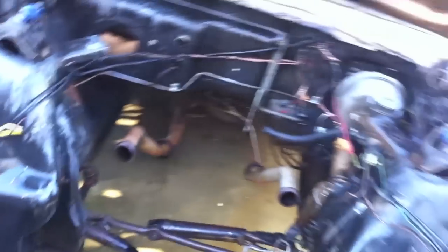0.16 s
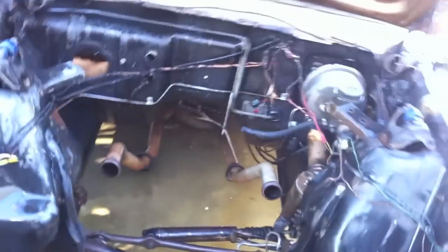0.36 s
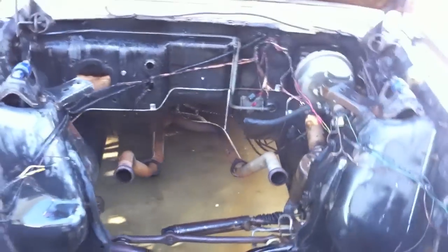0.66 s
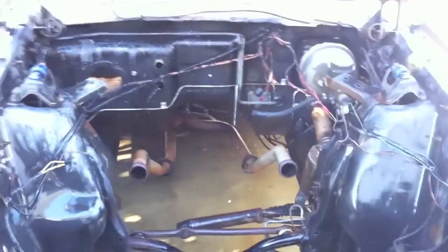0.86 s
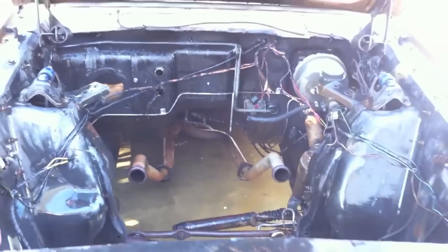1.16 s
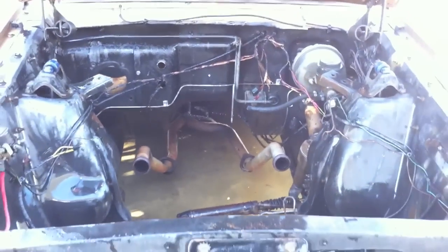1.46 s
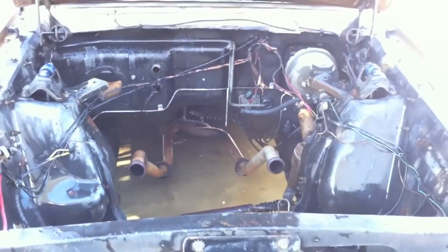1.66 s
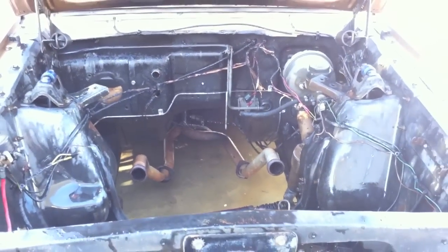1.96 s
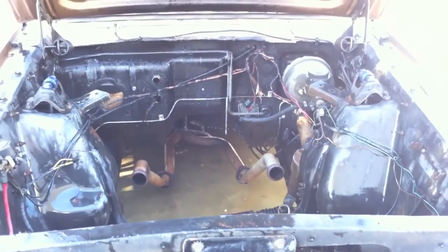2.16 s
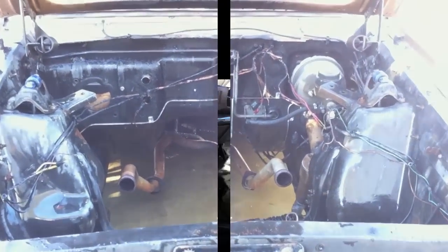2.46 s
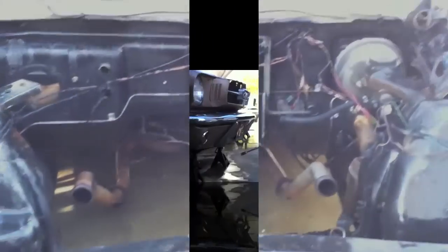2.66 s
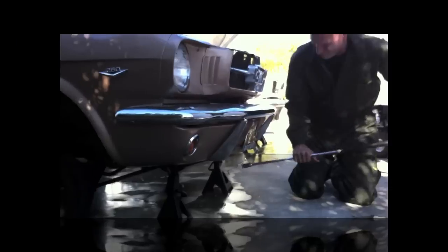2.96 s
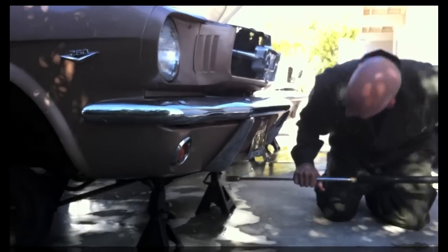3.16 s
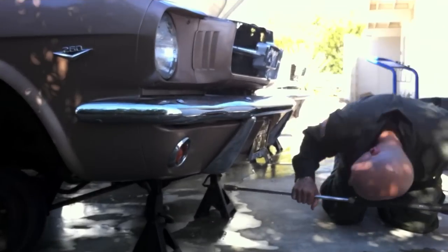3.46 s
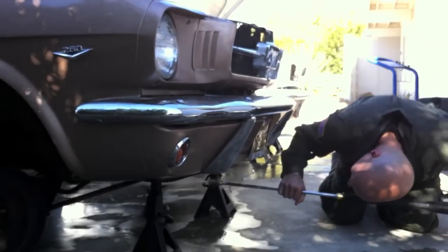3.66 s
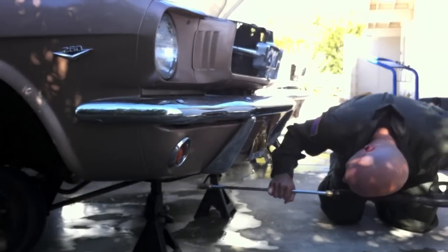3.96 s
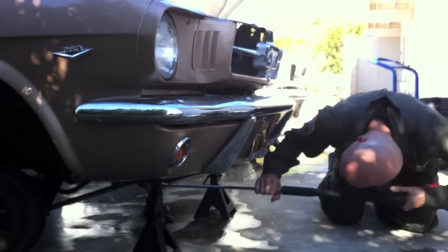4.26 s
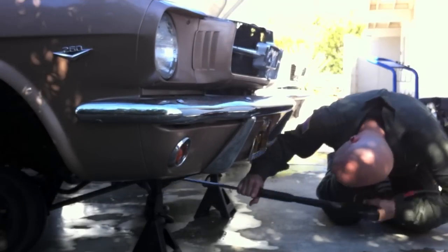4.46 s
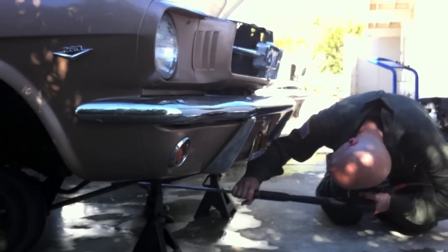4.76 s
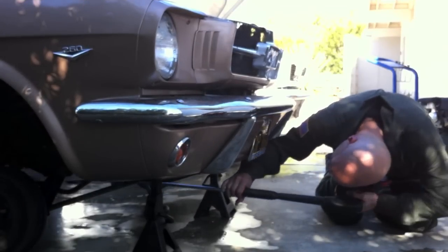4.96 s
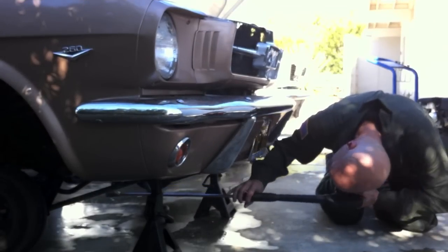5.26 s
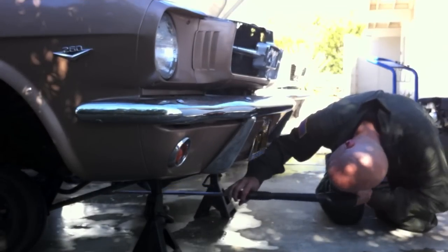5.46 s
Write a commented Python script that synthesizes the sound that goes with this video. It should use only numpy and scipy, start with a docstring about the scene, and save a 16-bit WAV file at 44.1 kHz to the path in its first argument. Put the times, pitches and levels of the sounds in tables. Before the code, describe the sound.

For the first 2.4 seconds there is only quiet outdoor air and a faint, wavering distant hum. Small handling ticks and a tiny clink come from an open engine bay, with a faint ringing metal scrape around 0.8 to 1.3 seconds. Between 2.4 and 3.3 seconds this fades into a much louder single-cylinder petrol pressure washer, puttering steadily in a driveway. At 3.8 seconds a water jet starts with a sharp spurt, hissing brightly and drumming under a car. The pump whines, and the engine dips in speed and turns harsher. The jet stops at about 4.3 seconds with four quick sputters of hiss as the engine recovers. A second spray starts at about 4.5 seconds and runs to the end, near 5.6 seconds, splashing harder against metal edges around 5.1 seconds. Soft low puffs of air touch the microphone during the spraying.

```python
"""A far hum over outdoor air, with small handling ticks and a faint metal scrape in an open engine bay.
This fades into a driveway where the single-cylinder four-stroke of a petrol pressure washer putters.
The trigger is pulled twice: the jet hisses and drums under a car, the piston pump whines,
and its load makes the engine sag until the governor opens the throttle."""
import sys
import numpy as np
from scipy import signal
from scipy.fft import rfft, irfft, next_fast_len
from scipy.io import wavfile

SR = 44100
rng = np.random.default_rng(int(sys.argv[2]) if len(sys.argv) > 2 else 0)


def waveform_to_disk(signal):
    """Save audio, clipped to [-1, 1], as 16-bit WAV at the path in sys.argv[1]."""
    frames = np.transpose(np.atleast_2d(signal))
    scaled = np.clip(frames, -1, 1) * 32767
    samples = np.round(scaled).astype(np.int16)
    wavfile.write(sys.argv[1], SR, samples)


N = 247842
TIME = np.arange(N) / SR
PUMP_ORDER = 18  # 3 pistons x 2 turns per firing x 3rd harmonic
LOAD_DELAY_S, LOAD_RISE_S = .083, .105  # pump load after a pull

# trigger pulls (on [s], off [s])
PULLS = [(3.796, 4.33), (4.544, 5.7)]
# hiss spectrum (frequency [Hz], level [dB])
HISS_COLOUR = [(1500, -8), (3000, -2.5), (5000, -3), (7000, -1), (9500, 2), (13000, 1), (15800, -2)]


def from_db(db):
    """Decibels to gain."""
    return 10 ** (np.asarray(db) / 20)


def rms_one(x):
    """Scale to unit rms."""
    return x / np.sqrt(np.mean(x ** 2) + 1e-20)


def in_time(rows):
    """Curve through (time [s], value) rows."""
    return np.interp(TIME, *np.transpose(rows))


def late(x, delay_s):
    """Delayed control curve."""
    return np.interp(TIME - delay_s, TIME, x)


def bell(at_s, sigma_s):
    """Gaussian bump of height 1."""
    return np.exp(-.5 * ((TIME - at_s) / sigma_s) ** 2)


def bumps(events, sigma_s):
    """One bell of gain per (time [s], level [dB]) row."""
    return sum(from_db(db) * bell(at_s, sigma_s) for at_s, db in events)


def swell(cycle, place, width):
    """Bump of height 1 in every engine cycle; place and width in cycles."""
    return np.exp(-.5 * (((cycle - place + .5) % 1 - .5) / width) ** 2)


def at_hz(colour, hz):
    """Gain of a (frequency [Hz], level [dB]) colour; 12 dB/octave roll-off below its first point."""
    knots_hz, db = np.transpose(colour)
    hz = np.maximum(hz, 1)
    return from_db(np.interp(np.log(hz), np.log(knots_hz), db)) * np.minimum(hz / knots_hz[0], 1) ** 2


def noise(colour):
    """Unit-rms noise of a (frequency [Hz], level [dB]) colour."""
    size = next_fast_len(N)
    spectrum = rfft(rng.standard_normal(size)) * at_hz(colour, np.fft.rfftfreq(size, 1 / SR))
    return rms_one(irfft(spectrum, size)[:N])


def drift(rate_hz):
    """Smooth unit-rms random wander, low-passed at rate_hz."""
    hop, settle = 40, 2000
    r = np.exp(-2 * np.pi * rate_hz * hop / SR)
    slow = signal.lfilter([1], [1, -2 * r, r * r], rng.standard_normal(N // hop + settle + 2))[settle:]
    return np.interp(np.arange(N) / hop, np.arange(len(slow)), rms_one(slow))


def resonate(x, hz, width_hz):
    """Two-pole resonance, unit peak gain."""
    r = np.exp(-np.pi * width_hz / SR)
    feedback = [1, -2 * r * np.cos(2 * np.pi * hz / SR), r * r]
    return signal.lfilter(np.array([1, 0, -1]) * (1 - r * r) / 2, feedback, x)


def repeat(partials, cycle, size=4096):
    """Unit-rms wave of complex partials 1, 2, 3.., played once per engine cycle."""
    shape = rms_one(irfft(np.r_[0, partials], size))
    return np.interp(cycle % 1 * size, np.arange(size + 1), np.r_[shape, shape[0]])


def outdoor_air(gain_db=8.0):
    """Soft, mostly low noise around the engine bay."""
    # (time [s], level [dB])
    levels = [(0, -64.5), (1, -64.5), (1.8, -66), (2.38, -65.5)]
    # (frequency [Hz], level [dB])
    colour = [(40, -42), (85, -14.5), (115, -10), (150, -9.5), (185, -1.5), (235, -6), (380, -16.5),
              (620, -15.5), (830, -18), (1100, -22.5), (1750, -27.5), (4000, -31.5), (9300, -33),
              (15800, -36)]
    return from_db(in_time(levels) + gain_db) * noise(colour)


def far_hum(gain_db=0.5, waver_db=1.7, waver_hz=1.15):
    """A distant tone, wavering in level and pitch."""
    # (time [s], frequency [Hz])
    pitches = [(0, 140.5), (.07, 134.5), (1.07, 144.9), (2.38, 149)]
    # (time [s], level [dB])
    levels = [(0, -50), (.06, -45.5), (.29, -55), (.4, -48), (.88, -54.5), (1.05, -51.5), (1.56, -56),
              (1.68, -61), (2.38, -56.5)]
    level_db = in_time(levels) + gain_db + waver_db * drift(11)
    hz = in_time(pitches) + waver_hz * drift(17)
    return from_db(level_db) * np.sqrt(2) * np.sin(2 * np.pi * np.cumsum(hz) / SR)


def ticks(gain_db=-6, tail_t60_s=0.11, crack_t60_s=0.017, crack_share=.45):
    """Handling ticks: noise bursts with a fast crack and a slower tail."""
    # (time [s], level [dB], treble re mids [dB], rise [s])
    touches = [(.09, -54.5, 0, .013), (.24, -54.5, 0, .012), (.481, -45, -17, .001), (.748, -56, 6, .008),
               (.78, -57, 3, .005), (1.017, -55, -6, .003), (1.297, -49, 2, .001), (1.506, -61, -2, .003),
               (1.69, -63, 4, .003)]
    mids = noise([(700, 3), (1800, 2), (3000, -3.0), (5000, -13.5), (12000, -28)])
    treble = noise([(3000, -10), (5500, 3), (8000, -4), (15000, -4)])
    out = np.zeros(N)
    for at_s, db, treble_db, rise_s in touches:
        age_s = np.clip(TIME - at_s, 0, 1)
        dying_s = np.maximum(age_s - rise_s, 0)
        crack = crack_share * from_db(-60 * dying_s / crack_t60_s)
        tail = (1 - crack_share) * from_db(-60 * dying_s / tail_t60_s)
        envelope = np.minimum(age_s / rise_s, 1) * (crack + tail)
        out += from_db(db + gain_db) * envelope * (mids + from_db(treble_db) * treble)
    return out


def clink():
    """A small clink: one decaying sine."""
    # (time [s], frequency [Hz], level [dB], t60 [s])
    strikes = [(.096, 1650, -55, 0.06)]
    out = np.zeros(N)
    for at_s, hz, db, t60_s in strikes:
        age_s = np.clip(TIME - at_s, 0, 1)
        out += from_db(db - 60 * age_s / t60_s) * np.sin(2 * np.pi * hz * age_s)
    return out


def scrape(friction_db=-2, ring_db=6, grain_db=2.5, attack_s=0.0074, t60_s=0.27):
    """Each stroke bites, holds and dies away; its grainy friction sets the metal ringing."""
    # (start [s], length [s], level [dB], ring drive re friction [dB])
    strokes = [(0.748, .11, -66, -4), (0.863, 0.053, -61, 11), (0.926, .04, -58.5, -4),
               (1.002, .035, -63, -4), (1.08, 0.1, -71, -3), (1.175, .06, -63, -5)]
    # (frequency [Hz], level [dB])
    friction_colour = [(650, 2), (850, 6), (1150, -1), (1800, 1.5), (3500, -3), (4300, -5), (5800, -13),
                       (7000, -18), (15000, -23)]
    # (frequency [Hz], bandwidth [Hz], level [dB])
    metal_modes = [(1990, 36, -9), (2340, 30, -6), (2750, 60, -4), (2940, 25, -6), (3100, 25.28, -9),
                   (3200, 25, 1), (3500, 28, 1), (3740, 22, 4), (4670, 25, 1), (5140, 21, 7.5),
                   (5800, 90, 1), (6510, 30, -6)]
    rubbing, drive = 0, 0
    for at_s, length_s, db, drive_db in strokes:
        dying_s = np.maximum(TIME - at_s - length_s, 0)
        stroke = from_db(db - 60 * dying_s / t60_s) * np.clip((TIME - at_s) / attack_s, 0, 1)
        rubbing += stroke
        drive += from_db(drive_db) * stroke
    grain = from_db(grain_db * drift(90)) * noise(friction_colour)
    force = drive * grain + 1e-18
    ringing = sum(from_db(db) * resonate(force, hz, width_hz) for hz, width_hz, db in metal_modes)
    return from_db(friction_db) * rubbing * grain + from_db(ring_db) * ringing


def buffets(sigma_s=0.02, draught_db=-61):
    """Short low puffs of air on the microphone over a steady draught."""
    # (time [s], level [dB])
    gusts = [(3.79, -48), (4.11, -41), (4.39, -46), (4.53, -45), (5.11, -41)]
    rumble = noise([(18, -6), (45, -4), (95, -1), (160, 5), (400, -40)])
    return (bumps(gusts, sigma_s) + from_db(draught_db)) * rumble


def firing_bursts(burst_sigma_s=0.0039, skirt_sigma_s=0.0099, skirt_db=-12, floor_db=-37):
    """Four short hiss bursts, one per engine firing, over a faint hiss between pulls."""
    # (time [s], level [dB])
    bursts = [(4.355, -25), (4.392, -25.5), (4.429, -26.5), (4.462, -29)]
    released = (TIME > PULLS[0][1]) & (TIME < PULLS[1][0])
    skirt = from_db(skirt_db) * bumps(bursts, skirt_sigma_s)
    return (bumps(bursts, burst_sigma_s) + skirt + from_db(floor_db) * released) * noise(HISS_COLOUR)


def pump_load(unload_delay_s=.048, unload_fall_s=.1135):
    """Load on the engine, 0-1; lags the trigger."""
    load = 0
    for on_s, off_s in PULLS:
        rise = np.clip((TIME - on_s - LOAD_DELAY_S) / LOAD_RISE_S, 0, 1)
        fall = np.clip(1 - (TIME - off_s - unload_delay_s) / unload_fall_s, 0, 1)
        load += rise * fall
    return np.clip(load, 0, 1)


def pump(cycle, load, whine_db=-24, surge_db=3.5, surge_sigma_s=.15, waver_db=1.5):
    """The pistons whine under pressure, most in the surge after each pull; the level dips twice."""
    # (time [s], sigma [s], depth [dB])
    dips = [(4.833, 0.019, 10), (5.14, 0.087, 4.5)]
    surge = sum((TIME > on_s) * bell(on_s + LOAD_DELAY_S + LOAD_RISE_S, surge_sigma_s)
                for on_s, _ in PULLS)
    dips_db = sum(depth_db * bell(at_s, sigma_s) for at_s, sigma_s, depth_db in dips)
    level_db = whine_db + surge_db * surge - dips_db + waver_db * drift(12.6)
    return from_db(level_db) * np.sqrt(2) * load * np.sin(2 * np.pi * PUMP_ORDER * cycle)


def pump_kick(cycle, depth_db=0.85):
    """Jet gain: each firing kicks the pump, so the spray throbs."""
    bump = swell(cycle, place=0.31, width=.1)
    return from_db(depth_db * (bump - bump.mean()))


def jet(load, throttle, load_share=0.16, hiss_db=-25.0, hiss_rise_db=6.5,
        drum_db=-32, drum_rise_db=10.5, splash_db=-40, splash_rise_db=10,
        flutter_db=1.0, spatter_db=2.0, open_s=0.0048, spurt_s=0.11, shut_s=0.023):
    """Water hisses at the nozzle, drums on panels and splashes off edges; all rise with pump power."""
    # per pull (spurt of stored pressure [dB], hiss trim [dB], drum trim [dB])
    strengths = [(6, 0.5, -1), (1, .5, -1)]
    # jet crossing underbody edges (time [s], sigma [s], splash [dB], drum [dB])
    crossings = [(4.308, 0.012, -38, -42), (5.08, 0.063, -25, -24), (5.13, 0.043, -21.5, -34)]
    # (frequency [Hz], level [dB])
    drum_colour = [(60, -35), (110, -4), (170, -1), (330, 6.5), (550, -7.5), (660, 0.5), (800, 4.5),
                   (1020, 2.5), (1170, -2.5), (1400, -1), (2200, -7.5), (3500, -20), (7000, -35.5)]
    # (frequency [Hz], level [dB])
    splash_colour = [(1500, -3), (3000, -5.5), (4200, -7), (5300, 2.5), (6800, -7.5), (10000, -26)]
    power = load_share * load + (1 - load_share) * throttle
    nozzle, panel, edge = 0, 0, 0
    for (on_s, off_s), (spurt_db, nozzle_db, panel_db) in zip(PULLS, strengths):
        age_s = np.maximum(TIME - on_s, 0)
        valve = np.minimum(age_s / open_s, 1) * np.clip((off_s - TIME) / shut_s + .5, 0, 1)
        flow = valve * from_db(spurt_db * np.exp(-(age_s / spurt_s) ** 2))
        nozzle += flow * from_db(hiss_db + nozzle_db + hiss_rise_db * power)
        panel += flow * from_db(drum_db + panel_db + drum_rise_db * power)
        edge += flow * from_db(splash_db + splash_rise_db * power)
    for at_s, sigma_s, edge_db, panel_db in crossings:
        edge = np.hypot(edge, from_db(edge_db) * bell(at_s, sigma_s))
        panel = np.hypot(panel, from_db(panel_db) * bell(at_s, sigma_s))
    hiss = nozzle * from_db(flutter_db * drift(41)) * noise(HISS_COLOUR)
    drum = panel * from_db(spatter_db * drift(19)) * noise(drum_colour)
    splash = edge * from_db(spatter_db * drift(32)) * noise(splash_colour)
    return hiss + drum + splash


def speed_sag(load, droop_hz=2.139, spring_hz=2.94, damping=.622, slip_cycles=.206):
    """Firing rate lost [Hz]. The governor is a damped spring: speed dips on load, overshoots after."""
    w = 2 * np.pi * spring_hz
    felt_load = signal.lfilter(*signal.bilinear([w * w], [1, 2 * damping * w, w * w], SR), load)
    return droop_hz * felt_load + slip_cycles * np.gradient(felt_load) * SR


def governor(sag_hz, idle=0.063, lag_s=0.031, full_sag_hz=3.3, bend=1.54):
    """Throttle opening, 0-1: the deeper the sag, the wider."""
    demand = np.maximum(late(sag_hz, lag_s) / full_sag_hz, 0) ** bend
    return np.clip(idle + (1 - idle) * demand, 0, 1)


def coasting(sag_hz, drop_db_per_hz=3.0, lag_s=0.045):
    """Engine gain: on overshoot the governor starves it and it fires more softly."""
    return from_db(drop_db_per_hz * np.minimum(late(sag_hz, lag_s), 0))


def muffler(orders, cycle, smear_rad, without_order=None):
    """Gas puffs set the partials' phases, the muffler their levels; echoes smear the higher ones."""
    # blow-down, exhaust stroke, intake gulp, rebound (place [cycles], strength [ratio])
    puffs = [(0.17, 0.83), (.302, 0.94), (.505, 1.0), (.63, 0.4)]
    db = np.array(orders)[:, 1]
    k = np.arange(1, len(db) + 1)
    puff_spectrum = -sum(strength * np.exp(-2j * np.pi * k * place) for place, strength in puffs)
    phase = np.angle(puff_spectrum) + smear_rad * (k / 10) ** 2 * rng.standard_normal(len(k))
    return repeat(from_db(db) * (k != without_order) * np.exp(1j * phase), cycle)


def valve_clatter(cycle, above_order, nominal_hz=30):
    """High random partials that repeat every cycle."""
    # (frequency [Hz], level [dB])
    colour = [(1100, 11), (1230, -19), (1400, 8.5), (1800, 3.5), (2500, 2.5), (4000, -7)]
    k = np.arange(1, 140)
    scatter = rng.standard_normal((len(k), 2)) @ [1, 1j]
    return repeat((k > above_order) * at_hz(colour, nominal_hz * k) * scatter, cycle)


def engine(cycle, load, throttle, note_db=-21.5, free_db=0.95, loaded_db=-0.1,
           clatter_db=-14, strain_db=3, rush_db=-29.0, bark_db=-18.0):
    """Exhaust note, valve clatter and gas rushing out at each firing; an open throttle makes it bark."""
    # muffler tone, running free (order [x firing rate], level [dB])
    free_orders = [(1, -43), (2, -40), (3, -33), (4, -24), (5, -9.5), (6, 0.5), (7, -9.5), (8, -9), (9, -3),
                   (10, -4.5), (11, -46), (12, -13.5), (13, -12), (14, -40), (15, -10.5), (16, -15.5),
                   (17, -15), (18, -15.5), (19, -11), (20, -21.5), (21, -41), (22, -11.5), (23, -18.5),
                   (24, -17), (25, -43), (26, -32), (27, -15), (28, -17), (29, -15), (30, -10), (31, -23),
                   (32, -15.5), (33, -12.5), (34, -39), (35, -17), (36, -34)]
    # muffler tone, loaded (order [x firing rate], level [dB])
    loaded_orders = [(1, -54), (2, -56), (3, -44), (4, -31.5), (5, -11.5), (6, -5), (7, -5), (8, -13.5),
                     (9, -10.5), (10, -1.5), (11, -17.5), (12, -4.5), (13, -23), (14, -19), (15, -13),
                     (16, -9), (17, -11.5), (18, 0), (19, -9.5), (20, -23), (21, -7.5), (22, -12),
                     (23, -31), (24, -42), (25, -12.5), (26, -38), (27, -40), (28, -13), (29, -9.5),
                     (30, -39), (31, -38), (32, -13.5), (33, -25), (34, -4.5), (35, -14), (36, -47),
                     (37, -43), (38, -12.5)]
    # overtones above the clatter under load (order [x firing rate], level [dB])
    strain_orders = [(49, -15), (51, -19), (61, -19), (68, -23)]
    # (frequency [Hz], level [dB])
    rush_colour = [(200, -8), (300, -10.5), (480, -7.5), (740, -6.5), (950, -9), (1220, -8.5), (1450, -7.5),
                   (2000, -12.5), (2900, -14.5), (5500, -16), (10300, -19.5), (14900, -24.5), (15800, -37)]
    bark_colour = [(200, -22), (900, 8.5), (1180, 8.5), (1500, 5), (3000, 7), (6000, 0.5),
                   (10000, -22), (15000, -24)]
    cycle = cycle + .001 * drift(25)  # firing jitter
    free = muffler(free_orders, cycle, smear_rad=0.18)
    loaded = muffler(loaded_orders, cycle, smear_rad=0.35, without_order=PUMP_ORDER)
    exhaust = from_db(free_db) * np.sqrt(1 - load) * free + from_db(loaded_db) * np.sqrt(load) * loaded
    strain = load * sum(from_db(db + strain_db) * np.sin(2 * np.pi * (k * cycle + rng.random()))
                        for k, db in strain_orders)
    clatter = from_db(clatter_db + 0.77 * load) * valve_clatter(cycle, above_order=len(free_orders))
    note = from_db(note_db) * (exhaust + strain + clatter)
    rush = from_db(rush_db + 3.93 * swell(cycle, place=0.27, width=0.22)) * noise(rush_colour)
    blow_down = swell(cycle, place=0.36, width=0.072) + 0.14 * swell(cycle, place=0.75, width=0.033)
    bark = from_db(bark_db) * throttle * blow_down * noise(bark_colour)
    return note + rush + bark


def scene(free_firing_hz=30.184, start_cycle=.833, fade_start_s=2.389, fade_s=0.95, fade_bend=0.93):
    """The engine bay fades into the driveway, where the trigger loads the washer; dual mono."""
    load = pump_load()
    sag_hz = speed_sag(load)
    throttle = governor(sag_hz)
    cycle = start_cycle + np.cumsum(free_firing_hz - sag_hz) / SR
    machine = coasting(sag_hz) * engine(cycle, load, throttle) + pump(cycle, load)
    water = pump_kick(cycle) * jet(load, throttle)
    driveway = machine + water + firing_bursts() + buffets()
    engine_bay = far_hum() + outdoor_air() + ticks() + clink() + scrape()
    fade = np.clip((TIME - fade_start_s) / fade_s, 0, 1) ** fade_bend
    mono = (1 - fade) * engine_bay + fade * driveway
    return np.array([mono, mono])


def record(dry):
    """Steep low-pass."""
    cutoff_hz = 15900
    return signal.sosfilt(signal.ellip(12, .1, 100, cutoff_hz, fs=SR, output="sos"), dry)


dry = scene()
out = record(dry)
waveform_to_disk(out)
```